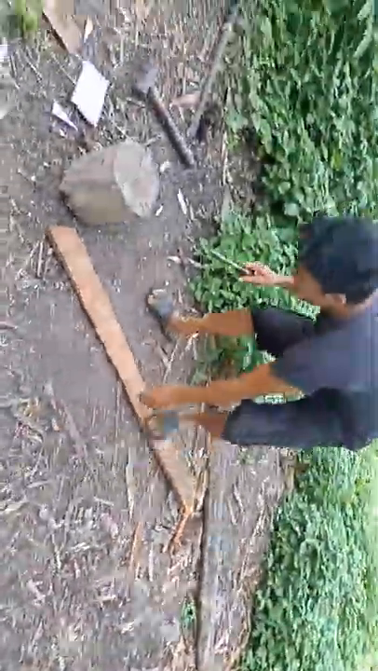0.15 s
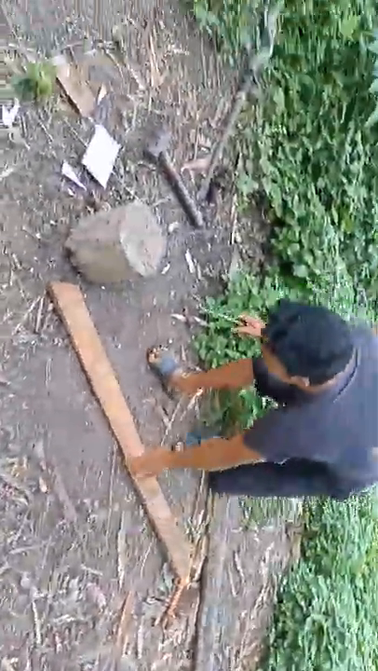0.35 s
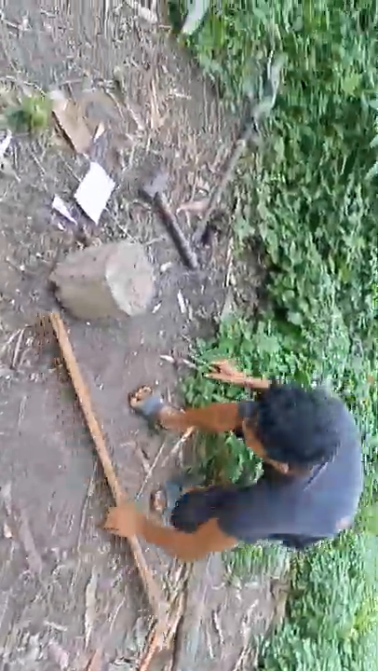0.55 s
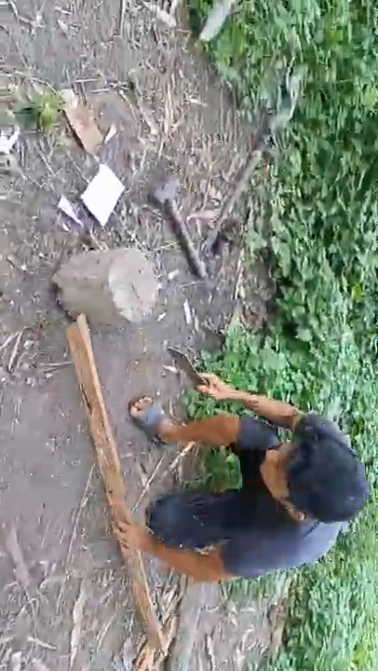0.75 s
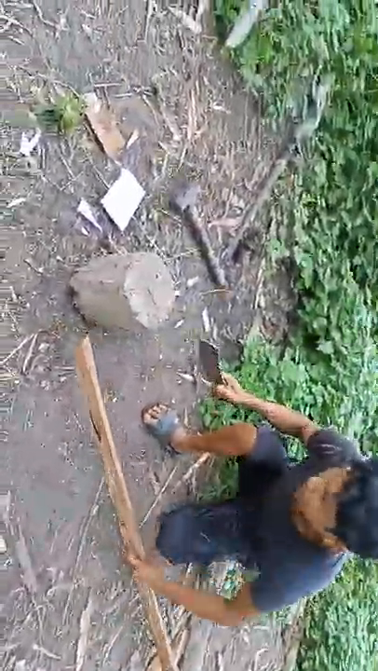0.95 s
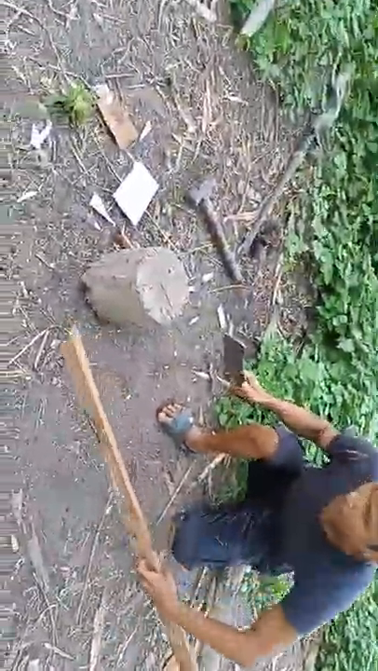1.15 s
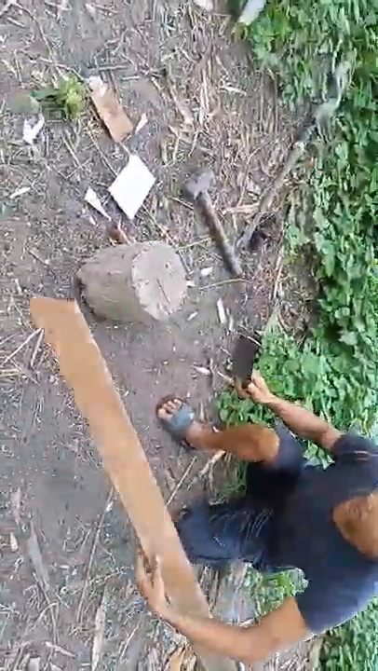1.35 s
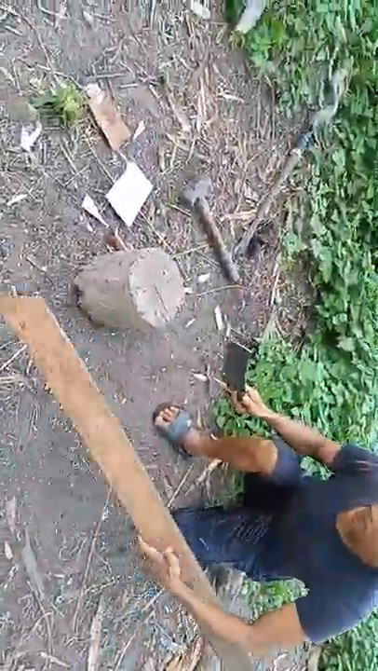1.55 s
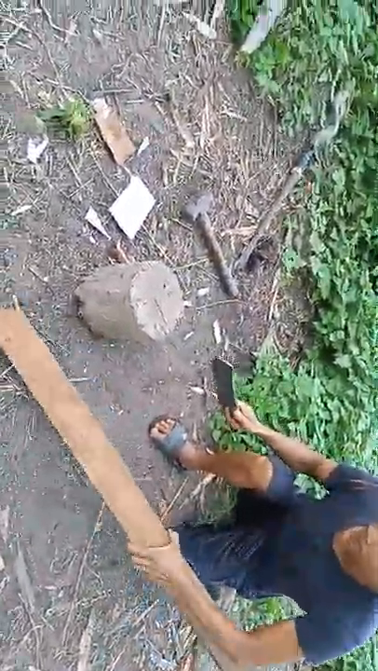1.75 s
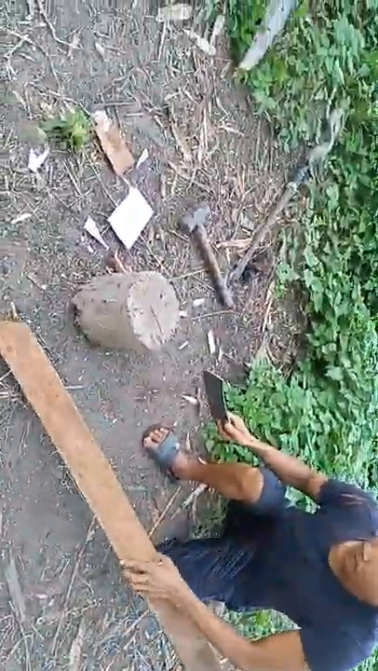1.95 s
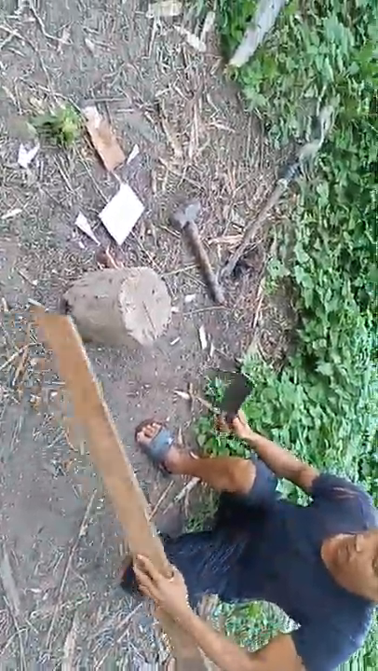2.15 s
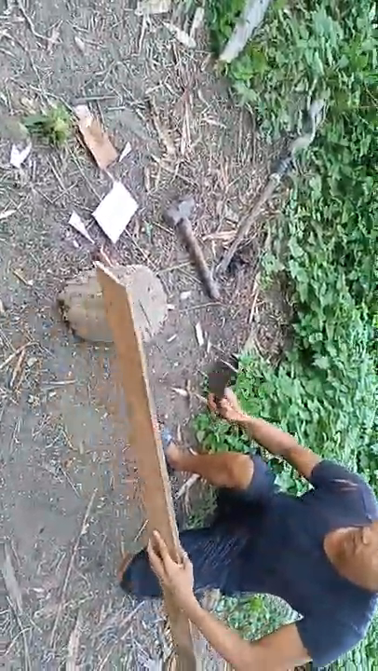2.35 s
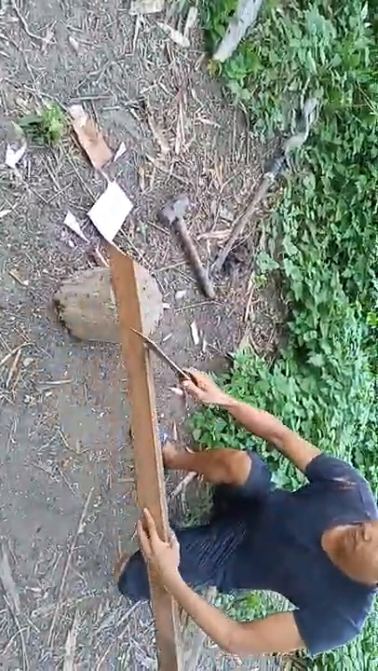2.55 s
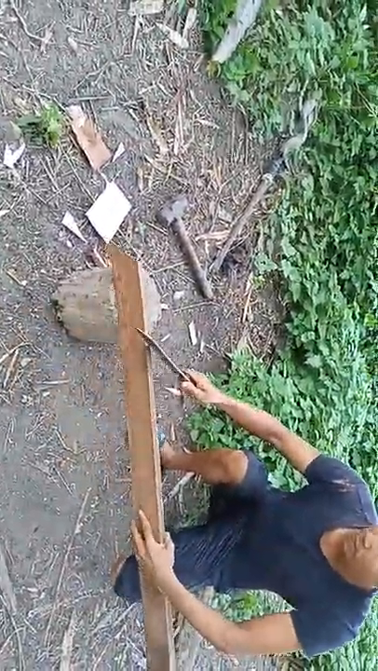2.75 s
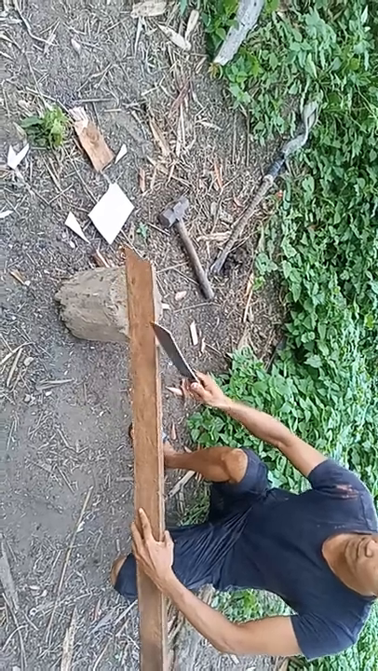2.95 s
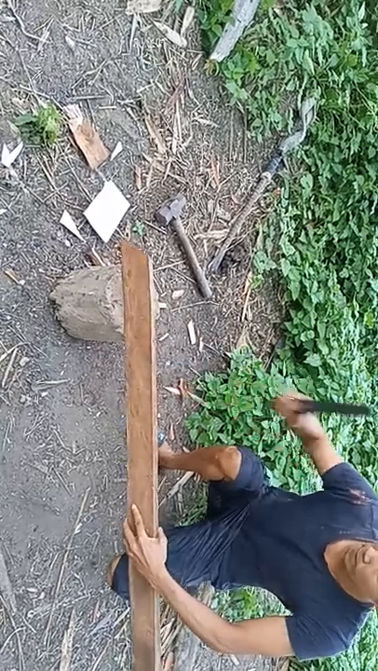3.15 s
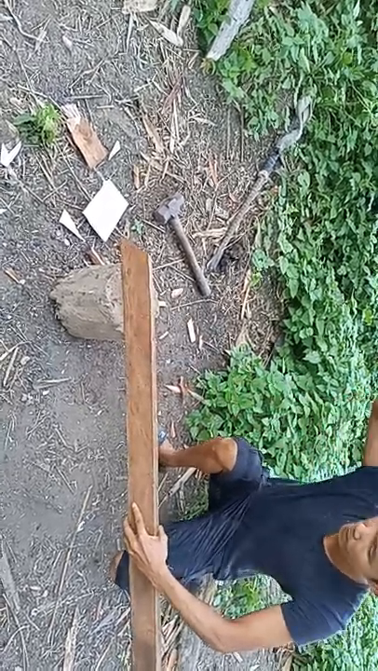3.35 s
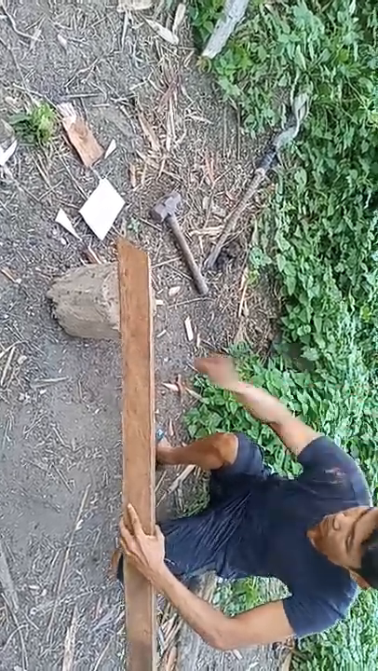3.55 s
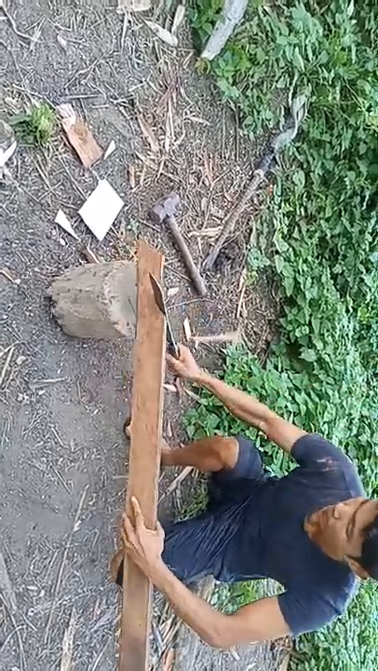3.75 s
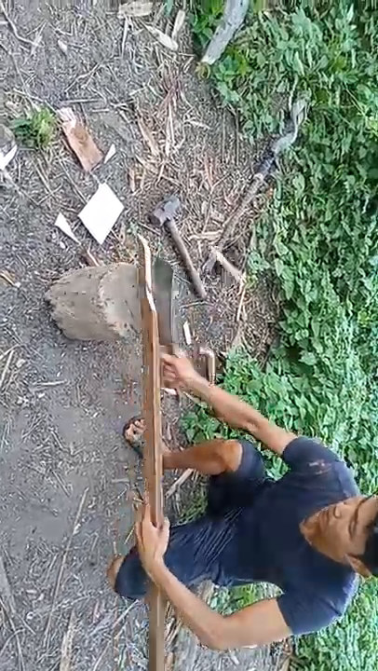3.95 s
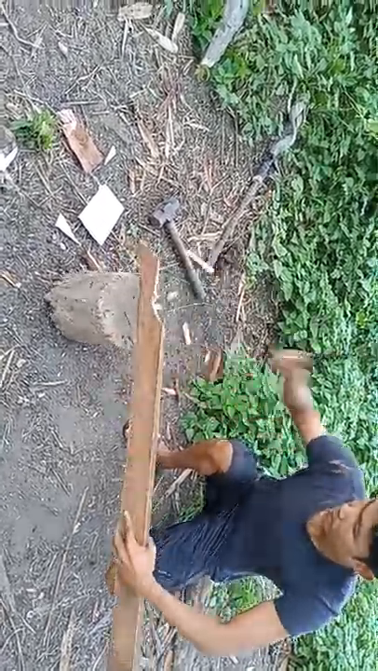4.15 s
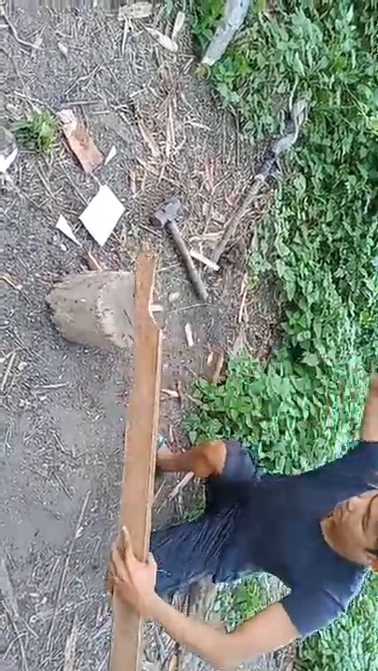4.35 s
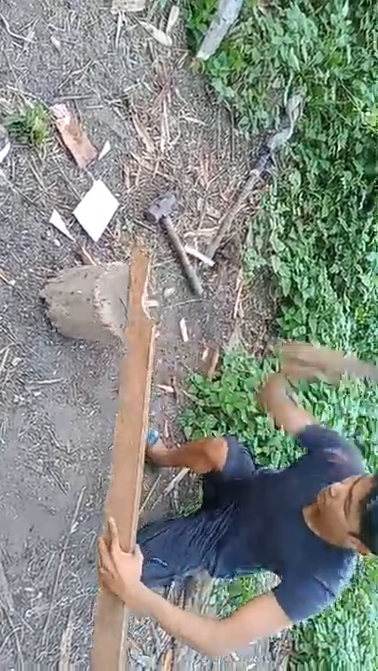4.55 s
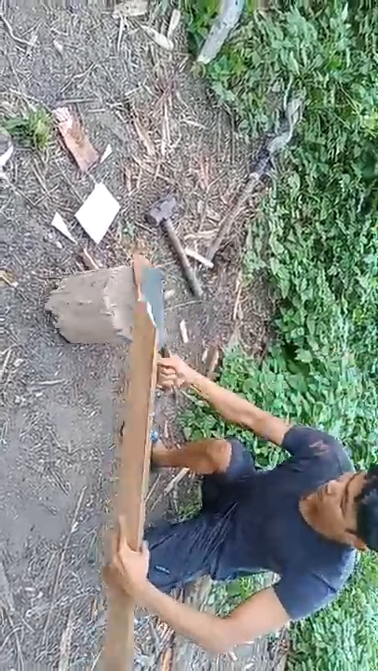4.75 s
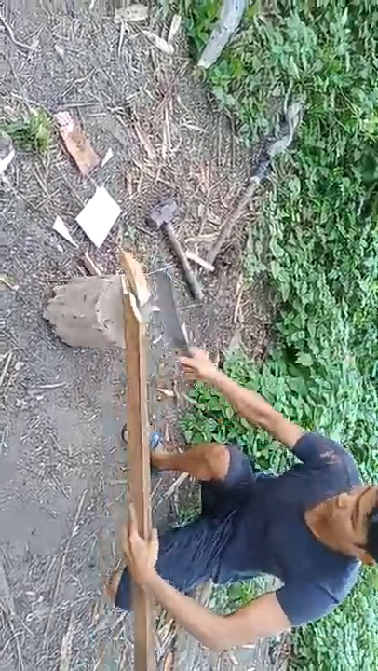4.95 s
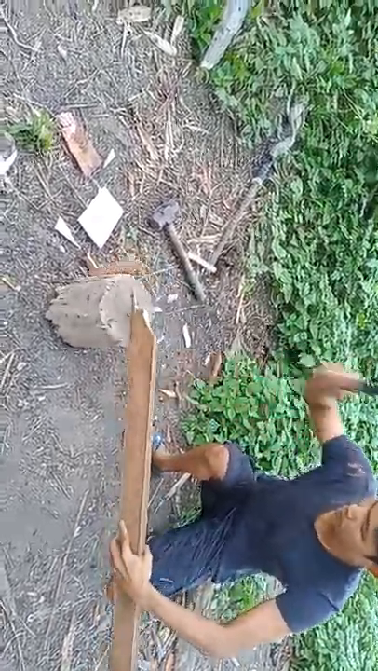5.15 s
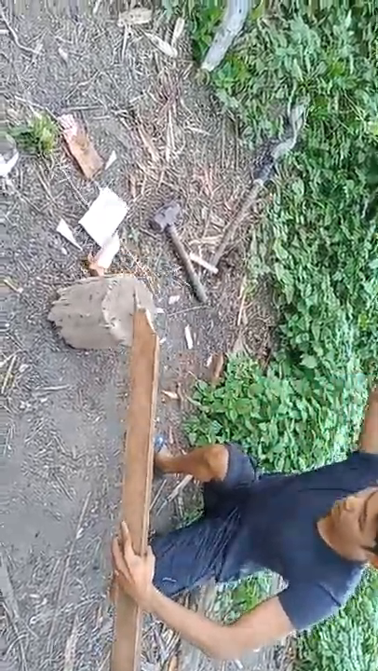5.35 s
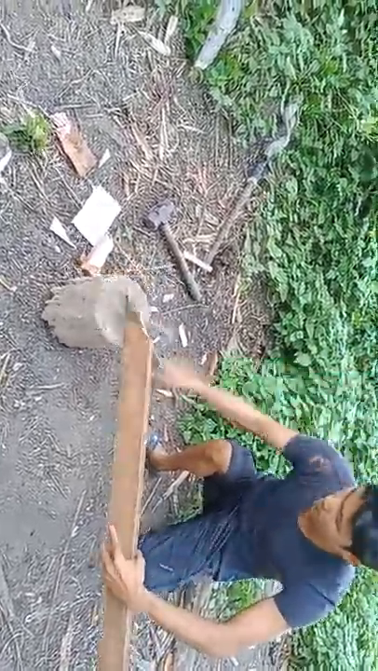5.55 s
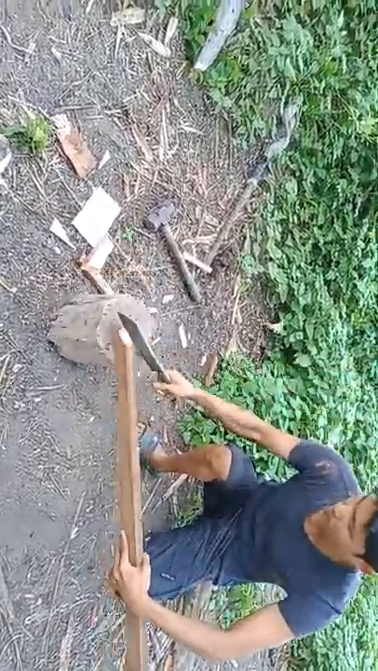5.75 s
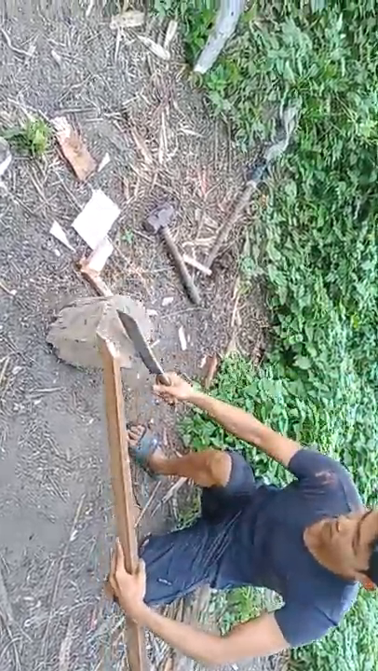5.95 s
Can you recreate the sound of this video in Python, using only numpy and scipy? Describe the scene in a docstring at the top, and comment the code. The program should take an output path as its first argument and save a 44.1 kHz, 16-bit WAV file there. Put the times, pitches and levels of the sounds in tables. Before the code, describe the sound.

A wooden plank is moved about with light clicks and knocks while feet rustle in dry leaves and twigs. It lands on a stump with a louder knock. Then a machete chops into it three times, about a second apart, each blow a sharp crack with a thud, splintering and small pieces clattering down. The sound is fairly close, outdoors, with a short echo and faint insects behind.

```python
"""Splitting a plank with a machete

Outdoors, a plank is set down over a stump and split by three hard chops. The edge tears fibres and shakes
the stump, and ground and bushes reflect the sound. Plank, blade and chips click and ring on impact, and
the soil answers with dull thuds. Feet and wood rustle in dry litter; insects, a far hum and a thin tone
fill the air."""
import sys
import numpy as np
from scipy import signal
from scipy.fft import rfft, irfft, next_fast_len
from scipy.io import wavfile
from scipy.ndimage import uniform_filter1d, map_coordinates

SR = 44100
rng = np.random.default_rng(int(sys.argv[2]) if len(sys.argv) > 2 else 0)


def store_pcm(level_fs):
    """Save levels as 16-bit WAV."""
    pcm = np.round(np.clip(level_fs, -1, 1) * 32767).astype(np.int16)
    wavfile.write(sys.argv[1], SR, np.atleast_2d(pcm).T)


N = 265482

# Noise spectra: f/Hz, relative spectral level/dB
AIR_SPECTRUM = [(120, -30), (200, -11), (400, -13), (800, -14), (1300, -7), (2400, -8), (3300, -3),
                (4200, -9), (5200, -24), (6500, -30), (9000, -33), (16000, -42)]
RUMBLE_SPECTRUM = [(30, -22), (70, -11), (110, 2), (160, -2), (250, -35), (500, -51)]
LITTER_SPECTRUM = [(120, -66), (200, -22), (453, -30.5), (694, -16.5), (2020, -15.5), (2200, -17.5),
                   (3690, -16.5), (5650, -36), (6290, -32), (14000, -67)]
TEAR_SPECTRUM = [(180, -33.5), (300, -10), (624, -7), (946, -4.5), (1250, -14.5), (2280, -5.5), (2520, -4),
                 (3240, -2), (5700, -20), (6620, -19), (9710, -37.5), (12500, -56), (16000, -45.5)]
NEAR_ECHO_SPECTRUM = [(150, -27), (500, -5), (1300, -0.5), (2000, -4), (3400, -9), (4400, -0.5),
                      (5300, -30.5), (6600, -25.5), (8500, -23.5), (10000, -48), (15500, -39.5)]  # stump and ground
FAR_ECHO_SPECTRUM = [(300, -20.5), (1300, -20), (1900, -7.5), (3400, -9.5), (4400, -18.5), (5300, -30.5),
                     (8500, -24.5), (10000, -44), (15500, -44)]
# Level curves: t/s, level/dB
AIR_LEVEL = [(0, -63), (2.5, -63), (3.1, -64), (3.55, -63), (4.3, -63), (4.45, -67), (4.6, -65), (5.0, -63),
             (5.5, -64), (6.03, -63)]
CRICKET_LEVEL = [(0, -95), (1.9, -92), (2.1, -85), (3.6, -85), (4.2, -84), (6.02, -88)]  # of the chirp's upper band
LITTER_LEVEL = [(0, -54), (.14, -58), (.3, -64), (.5, -57), (.74, -57), (.95, -61), (1.3, -57), (1.55, -56),
                (1.86, -60), (2.0, -66), (2.3, -76)]  # leaves stirred while crouching
# Bursts of a near insect, sinking in pitch: t/s, level/dB, frequency shift/Hz
BUZZES = [(0, -65.5, 250), (.1, -65, 0), (.215, -66.5, -250)]
# Bands of its wing noise: f/Hz, bandwidth/Hz, relative level/dB
WING_BANDS = [(6500, 800, 0), (7400, 800, 0)]
# A foot or chip brushes the litter: t/s, level/dB, time to fade by a factor e/s, gain of the lows/dB
SCUFFS = [(.335, -60, 0.025, 3), (0.426, -50, 0.038, -0.5), (1.185, -48, 0.03, -6), (1.508, -47, 0.01, -8),
          (1.645, -58, .012, -9), (1.853, -57, 0.014, -9), (4.98, -72, 0.073, 12),
          (5.1, -45.5, 0.062, -8.5), (5.195, -52.5, 0.0095, -5), (5.34, -56, 0.076, -1),
          (5.549, -50.5, 0.02, -13), (5.99, -49.5, 0.017, -15)]
# Contacts of plank and chips: t/s, click level/dB, click f/Hz, wood level/dB, wood f/Hz, thud level/dB
KNOCKS = [(0.035, -39, 3230, -54, 587, -53.5), (0.0923, -26.5, 2620, -38, 1270, -55),
          (0.314, -40, 3500, -44.5, 890, -47), (0.5322, -32.5, 2840, -44.5, 960, -62),
          (0.737, -32.5, 3200, -51, 1400, -60), (0.7605, -33.5, 1940, -56, 790, -41.5),
          (0.973, -38.5, 2650, -64, 1510, -72), (1.044, -38, 2920, -43, 1460, -51),
          (1.1155, -31, 2900, -53, 1060, -68), (1.1327, -33, 2820, -57, 1060, -77),
          (1.153, -38, 3000, -63, 1000, -78), (1.175, -33, 2000, -57, 1700, -75),
          (1.195, -30.5, 3340, -55, 1500, -77), (1.3033, -36.5, 3570, -43.5, 1160, -64),
          (1.4202, -27.5, 3780, -39.5, 905, -53), (1.4534, -33.5, 3880, -40.5, 1800, -75),
          (1.499, -32, 3660, -53, 1800, -70), (1.511, -25.5, 3730, -45, 1810, -53),
          (1.6804, -48, 3370, -37, 880, -37), (1.7492, -46, 3150, -41, 940, -40),
          (2.5572, -31, 1720, -67, 1460, -36.5), (2.602, -16.5, 2060, -12, 1000, -23.5),
          (2.919, -31, 1690, -29.5, 657, -27.5), (2.9521, -48, 3280, -42, 744, -40),
          (3.6133, -2.5, 2540, -4, 920, -18.5), (3.6378, -14.5, 1920, -27, 925, -19),
          (3.663, -20, 1900, -15, 880, -32), (3.759, -13, 3840, -46, 930, -43),
          (3.784, -20, 4300, -42, 900, -61), (3.7948, -0.5, 4340, -11.5, 813, -21.5),
          (3.8481, -26, 1780, -31, 800, -27), (3.8657, -51, 3370, -21.5, 780, -32),
          (3.9163, -16, 3090, -33, 1080, -33.5), (3.924, -17, 3260, -55, 969, -32.5),
          (3.953, -56, 1880, -19.5, 860, -27), (3.75, -36, 4300, -72, 900, -70),
          (3.941, -41, 3100, -72, 900, -66), (4.037, -31.5, 2950, -68, 820, -76.5),
          (4.165, -52, 1680, -48, 900, -50.5), (4.183, -15, 3735, -41, 910, -38.5),
          (4.313, -41.5, 4010, -38.5, 852, -51), (4.638, -6, 3290, -26.5, 943, -18),
          (4.7076, -24, 1720, -18.5, 1090, -32.5), (4.824, -44.5, 1510, -25, 770, -39),
          (4.852, -43, 1610, -32, 1110, -42), (4.8609, -15, 1760, -18.5, 1080, -32.5),
          (4.886, -29, 3500, -54, 1000, -36), (4.901, -69.5, 2750, -70, 1640, -42),
          (4.9298, -31, 1730, -37.5, 566, -31), (4.948, -26, 6340, -70, 600, -70),
          (4.9486, -34, 2330, -41, 547, -31), (5.005, -38, 1900, -46, 537, -36.5),
          (5.031, -45, 3600, -75, 1000, -71), (5.054, -48, 3600, -77, 1000, -73.5),
          (5.0755, -39, 3690, -75, 1000, -70), (5.088, -34, 2030, -83, 1260, -65),
          (5.098, -31, 3900, -75, 1000, -73), (5.1185, -35, 3900, -75, 1000, -68),
          (5.14, -32, 3700, -72, 703, -73), (5.171, -31, 3700, -74, 680, -74),
          (5.2252, -28, 3550, -30, 1010, -37), (5.297, -16, 2840, -26.5, 1520, -76),
          (5.304, -16.5, 3090, -48, 1550, -75), (5.3089, -18.5, 3520, -18.5, 1710, -74),
          (5.3348, -32, 3030, -64, 1150, -83.5), (5.38, -48, 4050, -72, 1000, -80),
          (5.4, -37, 4170, -72.5, 1000, -75), (5.405, -36, 3540, -71, 1000, -68),
          (5.69, -37, 2000, -43, 596, -38), (5.7079, -22, 2100, -19, 766, -23.5),
          (5.7422, -30, 3080, -50, 826, -57), (5.754, -28, 6570, -58, 800, -70),
          (5.7637, -24, 8100, -38, 776, -69), (5.8132, -35, 3010, -31.5, 800, -31),
          (5.9858, -37, 2070, -55, 940, -45)]
# A knee, heel or plank end presses the soil: t/s, peak level/dB, f/Hz
SOIL_PUSHES = [(0.316, -48, 183), (1.302, -38, 179), (1.68, -41, 274), (1.752, -44.5, 223),
               (3.663, -26, 183)]
# A thin far tone: t/s, duration/s, level/dB, f/Hz
FAR_TONES = [(0.376, 0.58, -68.5, 1376), (2.747, 0.41, -67.5, 1376), (3.454, .17, -63.5, 1386),
             (5.11, 0.12, -59, 719)]
# Modes of the struck bodies: f/Hz, relative level/dB, T60/s
BLADE_MODES = [(3260, 13, 0.11), (3800, -8, 1), (4260, 14.5, 0.057), (6000, -6, 0.067)]
PLANK_MODES = [(441, -9, .1), (614, -20, .06), (807, -5, .07), (900, 0, .04), (1023, -3, .06),
               (1244, -5, .07), (1500, -16, .05), (1820, -18, .05)]
WEDGED_MODES = [(877, -8, 0.07), (1497, -22, 0.15), (1960, -5, 0.2), (2466, -8, 0.11), (2541, -4, 0.12),
                (2907, -8, 0.1), (3112, -13, 0.2), (3413, -3, 0.094), (3984, -20, 0.35)]  # the plank with the blade in it
OFFCUT_MODES = [(377, -16, 0.21), (883, 0, 0.13), (942, -8, 0.2), (1114, -12, .18), (1184, -9, 0.27),
                (1303, -14, 0.28), (1534, -6, 0.2), (1733, -11, 0.22), (2030, -20, .3), (2750, -16, .15),
                (3192, -18, 0.19), (3865, -24, 0.2)]  # a long dry chip
END_PIECE_MODES = [(385, 10.5, 0.18), (840, -15.5, 3), (1470, -37, 5.0)]  # the piece cut off last
# Impacts on those bodies: t/s, peak level/dB
BLADE_TAPS = [(0.7221, -36.5)]
PLANK_HITS = [(0.759, -42), (2.6029, -15.5), (2.923, -30), (3.613, -15)]
WEDGED_BLOWS = [(3.613, -17.5), (4.637, -23), (5.584, -9)]
OFFCUT_FALLS = [(4.185, -24.5), (4.31, -43), (4.364, -48.5)]
END_PIECE_FALLS = [(5.814, -37)]
# Weight shifts as the plank is lifted: t/s, duration/s, level/dB
WEIGHT_SHIFT = (1.214, 0.398, -60)
# Chops and the cracks that follow: t/s, tear level/dB, rise/s, cutting time/s, deep thump level/dB,
# upper thump level/dB, hollow knock re tear/dB, tilt/(dB per octave), echo gain re tear/dB
CHOPS = [(3.6099, -11.5, .004, 0.0089, -11.5, -9.5, -2, 3, -20),
         (3.794, -17, 0.00094, 0.0041, -34.5, -26, -12, 6.5, -26),
         (4.637, -12.5, 0.0021, 0.0085, -14.5, -28.5, -2, 1.5, -15.5),
         (4.7582, -18.5, 0.00088, 0.0078, -37.5, -43, -23, 3.5, -23.5),
         (4.7657, -20, 0.0029, 0.0058, -56, -30.5, -14, 1.5, -26.5),
         (4.774, -16, 0.00056, 0.0053, -48, -46, -22, 3.5, -20.5),
         (5.5808, -8, 0.0019, 0.0082, -15.5, -44, -27, -0.5, -16.5)]


def amp(db):
    """Amplitude ratio of a level in dB."""
    return 10 ** (np.asarray(db) / 20)


def unit(x):
    """Normalisation to rms 1."""
    return x / np.sqrt(np.mean(x ** 2) + 1e-20)


def peaked(x):
    """Normalisation to peak 1."""
    return x / np.abs(x).max()


def along(points, hz):
    """Interpolation of (f/Hz, value) points on a logarithmic frequency axis."""
    f, values = np.transpose(points)
    return np.interp(np.log(hz + 1), np.log(f + 1), values)


def level(curve):
    """Gain per sample of a (t/s, level/dB) curve, silent outside it."""
    times, db = np.transpose(curve)
    return amp(np.interp(np.arange(N) / SR, times, db, left=-200, right=-200))


def held(start, length, fade):
    """Gate whose fades are centred on its start and end; times in s."""
    t = np.arange(N) / SR
    return np.clip(np.minimum(t - start, start + length - t) / fade + .5, 0, 1) ** 2


def decay(t, t60):
    """Exponential damping: 60 dB down after t60 seconds."""
    return amp(-60 * t / t60)


def wobble(rate):
    """Smooth random modulation with rate knots a second."""
    return map_coordinates(rng.standard_normal(int(N * rate / SR) + 4), [np.arange(N) * rate / SR])


def filtered(x, response):
    """Linear filtering: the spectrum of x times a frequency response."""
    size = next_fast_len(len(x) + 8192)
    return irfft(rfft(x, size) * response(np.fft.rfftfreq(size, 1 / SR)), size)[:len(x)]


def bandpass(x, low_hz, top_hz):
    """Third-order band-pass filter."""
    return signal.sosfilt(signal.butter(3, [low_hz, top_hz], "bandpass", fs=SR, output="sos"), x)


def resonance(f, hz, width_hz):
    """Complex response of a damped oscillator tuned to hz."""
    return 1j * f * width_hz / (hz * hz - f * f + 1j * f * width_hz + 1e-9)


def noise(length, spectrum, tilt_db=0):
    """Coloured noise of rms 1, tilted by tilt_db per octave about 2 kHz."""
    gain = lambda hz: amp(along(spectrum, hz) + tilt_db * np.log2((hz + 1) / 2000))
    return unit(filtered(rng.standard_normal(length), gain))


def band_noise(length, hz, width_hz, stages=2):
    """Noise of rms 1 through a cascade of equal resonators."""
    return unit(filtered(rng.standard_normal(length), lambda f: resonance(f, hz, width_hz) ** stages))


def add(track, start, x):
    """Superposition of x on track from start seconds."""
    part = track[round(start * SR):][:len(x)]
    part += x[:len(part)]


def still_air():
    """Ambient noise, modulated in random patches of time and frequency."""
    spectrogram = signal.stft(noise(N + 512, AIR_SPECTRUM), nperseg=512)[2]
    patches = uniform_filter1d(rng.standard_normal(spectrogram.shape), 5, axis=0)
    patches = unit(uniform_filter1d(patches, 16, axis=1))
    air = signal.istft(spectrogram * amp(3 * patches), nperseg=512)[1][:N]
    return level(AIR_LEVEL) * amp(wobble(3)) * unit(air)


def far_hum():
    """A wavering low sinusoid in noise, over a rumble that stays up after each hard blow."""
    tone = np.sin(2 * np.pi * np.cumsum(63.5 + 2 * wobble(6)) / SR)
    hum = amp(-63 + 2 * wobble(5)) * unit(tone + .5 * band_noise(N, hz=62, width_hz=30, stages=1))
    after_blow = sum(held(start, length=0.4, fade=0.048) for start, _ in WEDGED_BLOWS)
    rumble = amp(-65.5 + 9 * after_blow) * unit(amp(3 * wobble(4.5)) * noise(N, RUMBLE_SPECTRUM))
    return bandpass(hum + rumble, low_hz=26, top_hz=2000)


def insect_buzz():
    """Rapid amplitude modulation roughens bands of wing noise into a rasp."""
    out = np.zeros(N)
    rasp = rng.standard_normal(N) * amp(0.84 * wobble(173))
    for start, db, shift_hz in BUZZES:
        wings = lambda f: sum(amp(band_db) * abs(resonance(f, hz + shift_hz, width_hz)) ** 2
                              for hz, width_hz, band_db in WING_BANDS)
        out += amp(db) * held(start, length=0.09, fade=0.027) * unit(filtered(rasp, wings))
    return out


def cricket(period_s=0.243):
    """Periodic modulation of two noise bands gives about four chirps a second."""
    pulse = np.cos(np.pi * (np.arange(N) / SR - 2.8) / period_s) ** 12
    upper = pulse * amp(2.3 * wobble(1.3)) * band_noise(N, hz=7450, width_hz=630)
    lower = amp(20) * np.sqrt(pulse) * band_noise(N, hz=3500, width_hz=710)
    return level(CRICKET_LEVEL) * (upper + lower)


def insect_whirr():
    """Narrow-band noise, faint and high, with a flickering level."""
    return band_noise(N, hz=10600, width_hz=1200) * amp(-94.5 + 2 * wobble(20))


def rustle():
    """Dry leaves and twigs emit random impulses: clumped crackles on a hiss, swelling at each scuff."""
    t = np.arange(N) / SR
    strength = amp(1.2 * rng.exponential(size=N) + 3 * wobble(60))
    impulses = strength * (rng.random(N) < .04) * rng.standard_normal(N)
    crackle = unit(filtered(impulses, lambda hz: amp(along(LITTER_SPECTRUM, hz))))
    leaves = unit(amp(1.5 * wobble(30)) * (noise(N, LITTER_SPECTRUM) + .9 * crackle))
    highs = filtered(leaves, lambda hz: 1 / (1 + (1700 / (hz + 1)) ** 4))
    lows = leaves - highs
    scuffs = sum(amp(db) * np.exp(-((t - centre) / width) ** 2) * (highs + amp(lows_db) * lows)
                 for centre, db, width, lows_db in SCUFFS)
    return level(LITTER_LEVEL) * leaves + scuffs


def knocks():
    """Impact excites damped resonances: a bright click, a dry wooden knock and a thud of the soil."""
    out, t = np.zeros(N), np.arange(SR // 8) / SR
    scrape = lambda t60, rise: (1 - np.exp(-t / rise)) * decay(t, t60) * rng.standard_normal(len(t))
    snap = np.arange(len(t)) == round(0.0012 * SR)  # sharp contact just after first touch
    soil = lambda f: (resonance(f, 230, 270) - 1.18 * resonance(f, 397, 150)) * resonance(f, 800, 660)
    for start, click_db, click_hz, wood_db, wood_hz, thud_db in KNOCKS:
        bright = lambda f: resonance(f, click_hz, .3 * click_hz) ** 2 + .24 * resonance(f, 2500, 5000)
        woody = lambda f: resonance(f, wood_hz, .5 * wood_hz) ** 2 * resonance(f, 900, 1500)
        click_t60 = 0.028 * amp(.22 * min(click_db + 20, 0))  # clicks below -20 dB die sooner
        click = filtered(scrape(click_t60, rise=0.0002) + amp(13) * snap, bright)
        wood = filtered(scrape(t60=0.014, rise=0.002) + amp(14) * snap, woody)
        thud = filtered(scrape(t60=0.025, rise=0.002), soil)
        for db, part in ((click_db, click), (wood_db, wood), (thud_db, thud)):
            add(out, start, amp(db) * peaked(part))
    return bandpass(out, low_hz=93.4, top_hz=4300) + amp(-19) * bandpass(out, low_hz=4300, top_hz=7640)


def with_reverberation(direct):
    """Convolution with decaying noise adds a short diffuse tail to the direct sound."""
    t = np.arange(SR // 2) / SR
    tail = noise(len(t), [(100, -1), (800, -2.5), (2500, -2), (6000, -9)]) * decay(t, t60=0.18)
    delayed = np.pad(direct, (300, 0))  # about 7 ms
    return direct + amp(-17) * signal.fftconvolve(delayed, tail / np.linalg.norm(tail))[:N]


def soil_pushes():
    """Soft pushes into the soil give heavily damped low oscillations."""
    out, t = np.zeros(N), np.arange(SR // 10) / SR
    for start, db, hz in SOIL_PUSHES:
        add(out, start, amp(db) * peaked(t * decay(t, t60=0.029) * np.sin(2 * np.pi * hz * t)))
    return out


def far_tone():
    """A thin sinusoid with slight frequency modulation comes and goes."""
    waver_hz = 3 * wobble(38)
    sine = lambda hz: np.sqrt(2) * np.sin(2 * np.pi * np.cumsum(hz + waver_hz) / SR)
    return sum(amp(db) * held(start, length, fade=0.13) * sine(hz) for start, length, db, hz in FAR_TONES)


def ring(modes, t):
    """Free vibration of peak 1: damped modes of randomly scattered strength and drifting phase."""
    steps = rng.standard_normal((len(modes), len(t)))
    drifts = 7 * np.cumsum(uniform_filter1d(steps, 200), axis=1) / np.sqrt(SR)
    vibration = sum(amp(db + 2 * rng.standard_normal()) * decay(t, t60) * np.sin(2 * np.pi * hz * t + drift)
                    for (hz, db, t60), drift in zip(modes, drifts))
    return peaked(vibration * (1 - np.exp(-t / 0.0019)))


def struck_bodies():
    """Blade, plank and cut pieces ring in their normal modes when they are struck or land."""
    out, t = np.zeros(N), np.arange(SR // 3) / SR
    for modes, hits in ((PLANK_MODES, PLANK_HITS), (OFFCUT_MODES, OFFCUT_FALLS),
                        (END_PIECE_MODES, END_PIECE_FALLS), (WEDGED_MODES, WEDGED_BLOWS),
                        (BLADE_MODES, BLADE_TAPS)):
        for start, db in hits:
            add(out, start, amp(db) * ring(modes, t))
    return out


def shifting_weight():
    """Shifting weight makes a dull rumble: low band noise with an uneven envelope."""
    start, length, db = WEIGHT_SHIFT
    rumble = band_noise(N, hz=266, width_hz=150)
    return amp(db + 2.2 * wobble(20.95)) * held(start, length, fade=0.079) * rumble


def chops():
    """Fracture: the edge tears fibres for some ms, exciting the plank's resonance and shaking the stump."""
    out, t = np.zeros(N), np.arange(SR) / SR
    for start, db, rise, cut, deep_db, upper_db, hollow_db, tilt_db, echo_db in CHOPS:
        bite = (1 - np.exp(-t / rise)) * np.exp(-(t / cut) ** 4)  # loud while the edge travels
        fibres = noise(SR, TEAR_SPECTRUM, tilt_db)
        hollow_knock = amp(hollow_db) * band_noise(SR, hz=888, width_hz=180)
        tear = amp(db) * bite * (fibres + hollow_knock)
        deep = amp(deep_db) * np.sin(2 * np.pi * 92 * t)
        upper = amp(upper_db) * np.sin(2 * np.pi * 185 * t)
        thump = decay(t, t60=0.041) * (deep + upper)
        add(out, start, tear + thump + amp(db + echo_db) * chop_echo(t, tilt_db))
    return bandpass(out, low_hz=75, top_hz=19000)


def chop_echo(t, tilt_db):
    """Diffuse reflection as decaying noise: brief from stump and ground, longer from the bushes."""
    far = decay(t, t60=0.67) * noise(len(t), FAR_ECHO_SPECTRUM, tilt_db)
    far_treble = amp(-2) * decay(t, t60=.33) * bandpass(far, low_hz=5500, top_hz=19000)  # dies first
    far = bandpass(far, low_hz=100, top_hz=5500) + far_treble
    near = amp(16.5) * decay(t, t60=0.066) * noise(len(t), NEAR_ECHO_SPECTRUM, tilt_db)
    splinters = amp(2 * wobble(600) + 1.5 * wobble(90))[:len(t)]  # fibres keep snapping unevenly
    return (1 - np.exp(-t / 0.00021)) * splinters * (far + near)


def scene():
    """Superposition of all sources at one microphone."""
    wood = chops() + with_reverberation(knocks()) + struck_bodies()
    ground = soil_pushes() + shifting_weight() + rustle()
    background = still_air() + far_hum() + far_tone()
    insects = insect_buzz() + cricket() + insect_whirr()
    return (wood + ground + background + insects)[None]


def record(dry):
    """Saturation rounds the loudest peaks; a band limit removes everything above 16.1 kHz."""
    clipped = dry[0] / (1 + np.abs(dry[0]) ** 6) ** (1 / 6)
    return filtered(clipped, lambda hz: hz < 16100)[None]


dry = scene()
out = record(dry)
store_pcm(out)
```